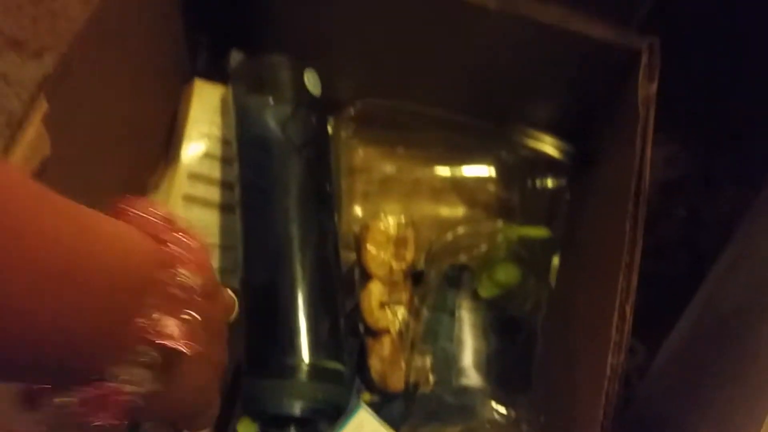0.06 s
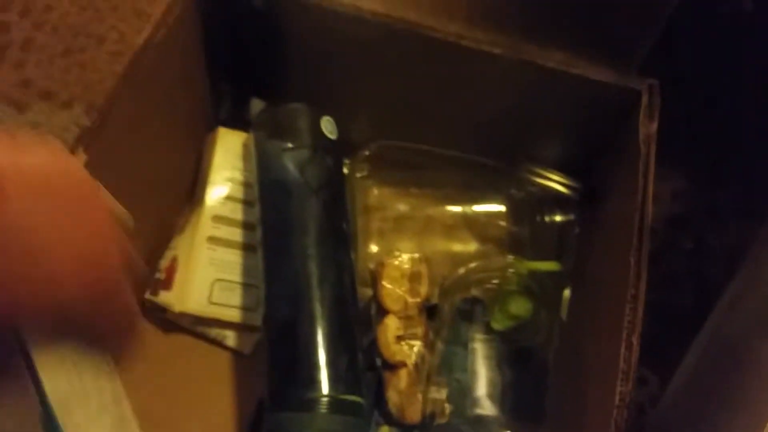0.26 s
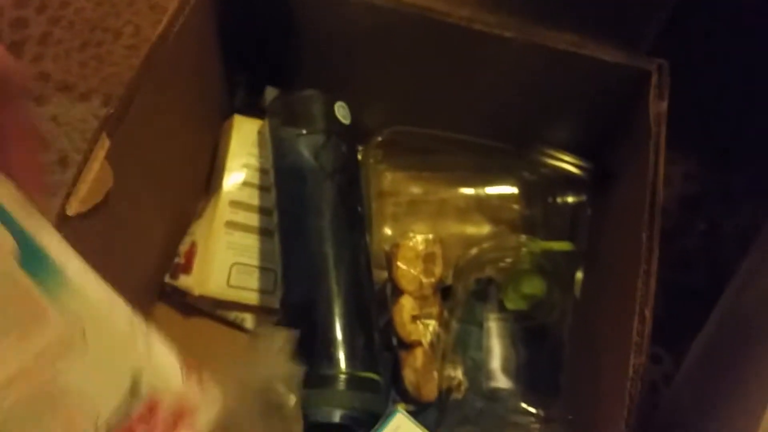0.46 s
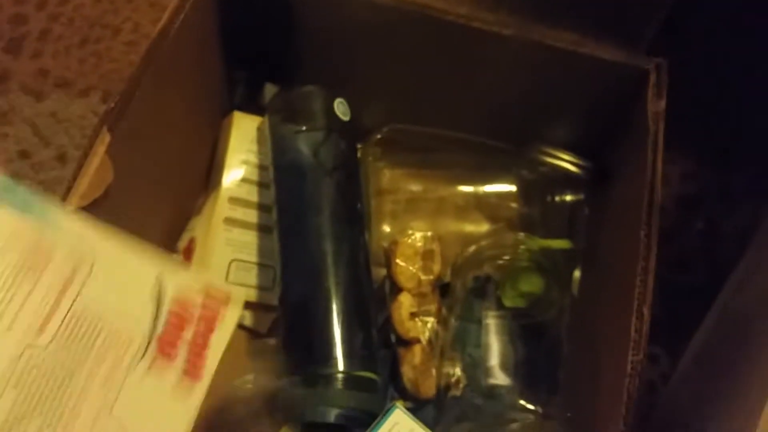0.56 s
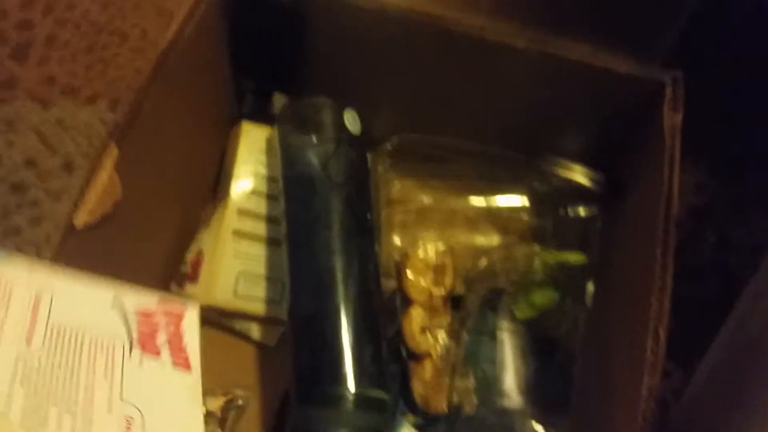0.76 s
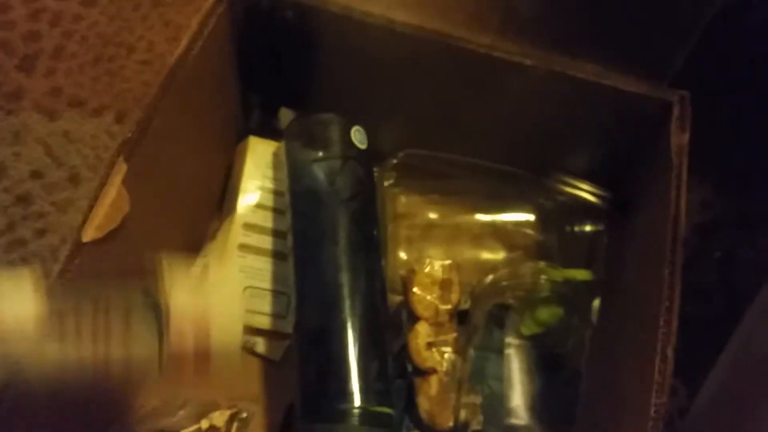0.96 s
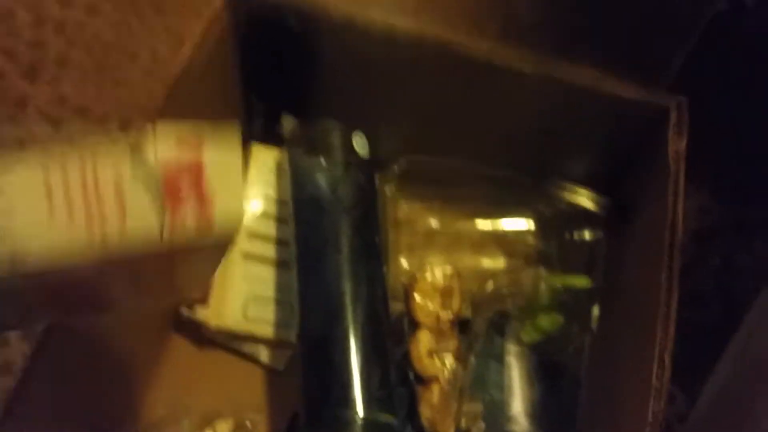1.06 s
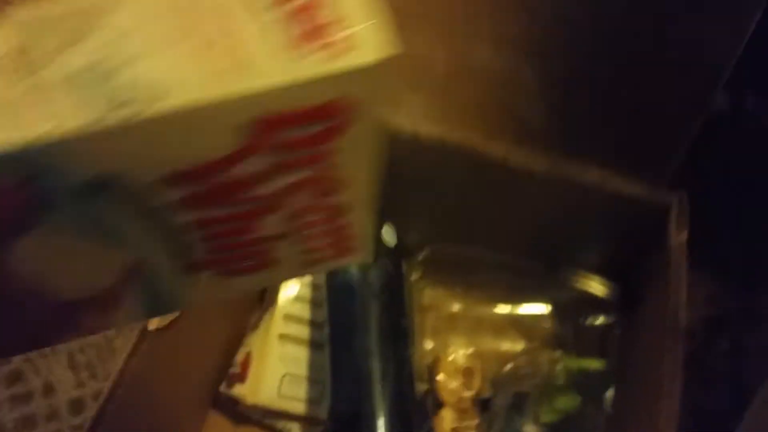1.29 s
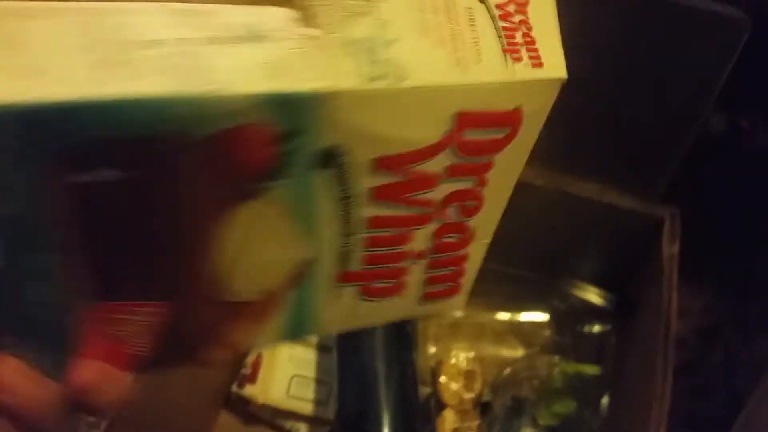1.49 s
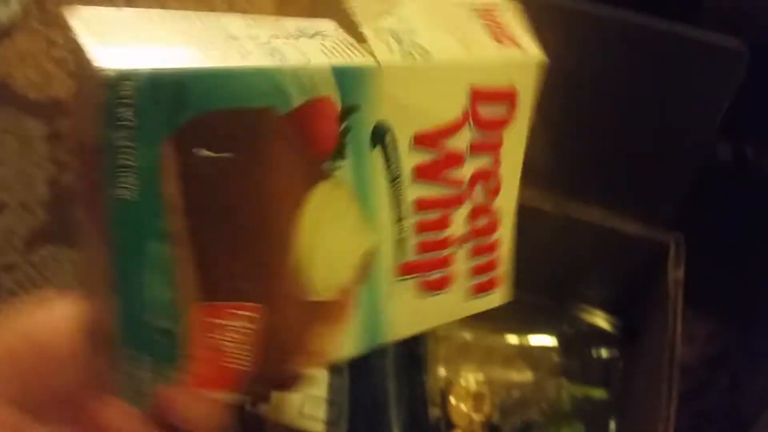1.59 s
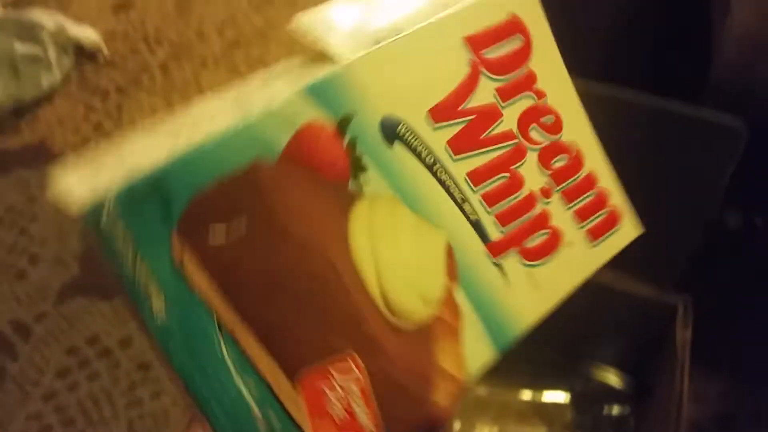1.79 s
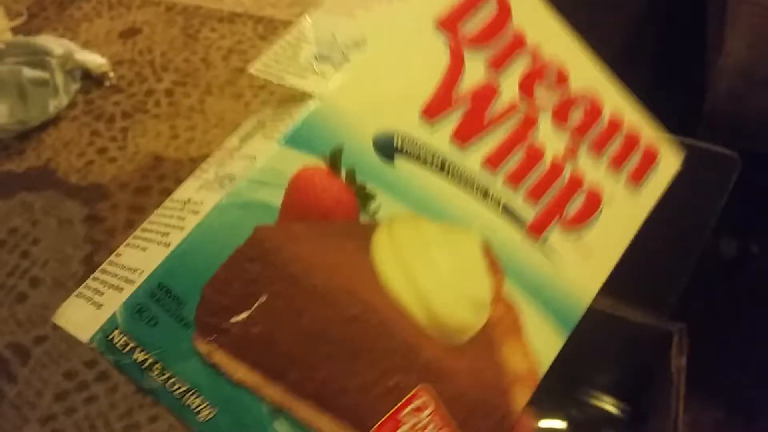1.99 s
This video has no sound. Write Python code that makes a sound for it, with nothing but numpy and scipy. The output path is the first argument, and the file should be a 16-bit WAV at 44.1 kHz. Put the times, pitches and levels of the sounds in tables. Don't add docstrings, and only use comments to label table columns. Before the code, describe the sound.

Close phone pickup indoors: dry cardboard knocks and rubbing, bright clusters of glass clinks and one hard clack, a last soft ring near one second, then low rumble, faint hum and tiny ticks.

```python
import sys
import numpy as np
from scipy import signal
from scipy.fft import rfft, irfft, next_fast_len
from scipy.io import wavfile
from scipy.ndimage import map_coordinates

SR = 44100
rng = np.random.default_rng(int(sys.argv[2]) if len(sys.argv) > 2 else 0)


def log_audio(samples):
    frames = np.atleast_2d(samples).T
    limited = np.clip(frames, -1, 1)
    pcm = np.round(limited * 32767).astype(np.int16)
    wavfile.write(sys.argv[1], SR, pcm)


def magnitude_from_level(level_db):
    exponent = np.asarray(level_db, float) / 20
    return 10 ** exponent


N = 90140
T = np.arange(N) / SR

# [f/Hz, likeness/0..1]
NEAR_LIKENESS = [(200, 0.97), (1000, 0.48), (4000, 0.18)]


def unit(x):
    return x / np.sqrt(np.mean(x ** 2) + 1e-20)


def along(points, hz):
    f, v = np.transpose(points)
    return np.interp(np.log(hz + 1), np.log(f + 1), v)


def wobble(rate):
    return map_coordinates(rng.standard_normal(int(N * rate / SR) + 4), [T * rate])


def filtered(x, response):
    m = next_fast_len(N + 8192)
    return irfft(rfft(x, m) * response(np.fft.rfftfreq(m, 1 / SR)), m)[..., :N]


def shaped(x, spectrum):
    return filtered(x, lambda hz: magnitude_from_level(along(spectrum, hz)))


def pair(likeness):
    def mid_side(hz):
        turn = np.arccos(np.clip(along(likeness, hz), -1, 1)) / 2
        return np.array([np.cos(turn), np.sin(turn)])
    mid, side = filtered(rng.standard_normal((2, N)), mid_side)
    return np.array([mid + side, mid - side])


def ports(x, balance, lag_s):
    def response(hz):
        right = magnitude_from_level(-along(balance, hz))
        delay = np.exp(-2j * np.pi * hz * lag_s)
        return 2 / (1 + right) * np.array([1 + 0 * right, right * delay])
    return filtered(x, response)


def burst(s, hold_s, t60, rise_s):
    t = np.maximum(T - s, 0)
    return (1 - np.exp(-t / rise_s)) * magnitude_from_level(-60 * np.maximum(t - hold_s, 0) / t60)


def room():
    # [f/Hz, level/dB]
    rumble_colour = [(20, -14.5), (45, -14), (70, -12), (260, -19), (800, -24.5), (1200, -36), (2000, -60),
                     (3300, -120)]
    hiss_colour = [(880, -30), (1500, -4), (1840, -5), (3480, -11.5), (6320, -3.5), (8320, -29),
                   (15600, -25.5)]
    # [f/Hz, level/dB]
    likeness = [(60, 0.97), (400, 0.98), (1000, 0.12), (8000, .2)]
    balance = [(60, -1.5), (130, 4), (290, 1), (640, 7), (1410, 4.5), (3100, 10.5), (6820, 26),
               (15000, -5.5)]
    # [t/s, gain/dB]
    gain = [(0, 12.5), (.3, 7), (.65, 7), (1.3, -1.5), (1.75, 5), (2.04, 8)]
    rumble = unit(shaped(pair(likeness), rumble_colour)) * magnitude_from_level(-53 + wobble(10))
    hiss = unit(shaped(pair(likeness), hiss_colour)) * magnitude_from_level(-68.5 + 0.56 * wobble(18))
    hum = magnitude_from_level(-50 + 0.9 * wobble(30)) * np.sin(2 * np.pi * 59.9 * T + 0.29 * wobble(23))
    drone = magnitude_from_level(-62.5 + 2 * wobble(16)) * np.sin(2 * np.pi * 378 * T + 1.1 * wobble(25))
    heard = ports(rumble + hiss + hum + drone, balance, lag_s=.00048)
    return magnitude_from_level(np.interp(T, *np.transpose(gain))) * heard


def walls(x):
    # [f/Hz, t60/s]
    decay = [(200, 0.19), (2000, 0.26), (10000, 0.12)]
    hz, t, z = signal.stft(rng.standard_normal((2, SR // 3)), SR, nperseg=256)
    z = z * magnitude_from_level(-60 * t / along(decay, hz)[:, None])
    tail = signal.istft(z, SR, nperseg=256)[1]
    late = np.pad(x, ((0, 0), (200, 0)))
    return signal.fftconvolve(late, tail / np.linalg.norm(tail[0]), axes=1)[:, :N]


def ticks():
    # [t/s, peak level/dB, treble level/dB]
    moments = [(0.061, -15.5, 0), (0.1038, -9, -8.5), (0.172, -26, -15), (.417, -24, -8), (.484, -25, -3),
               (.4975, -20, -2), (0.8975, -31, -4), (1.113, -44, -18), (1.135, -48.5, -20),
               (1.2123, -45.5, -20), (1.4574, -36, -19.5), (1.6682, -49.5, -24.5)]
    # [f/Hz, level/dB]
    body_colour = [(2500, -19.5), (3800, -2), (5600, 4), (7300, -3.5), (8500, -30), (15500, -61.5)]
    treble_colour = [(6000, -40), (8500, -3.5), (12000, 0), (15500, -10)]
    body = unit(shaped(rng.standard_normal(N), body_colour))
    treble = unit(shaped(rng.standard_normal(N), treble_colour))
    out = np.zeros(N)
    for s, db, treble_db in moments:
        click = burst(s, hold_s=0, t60=0.01, rise_s=0.00041)
        out += magnitude_from_level(db - 2) * click * (body + magnitude_from_level(treble_db) * treble)
    return out * magnitude_from_level([[0], [-10]])


def drag():
    # [t/s, level/dB]
    strength = [(0, -40.5), (.1, -33.5), (.22, -38.5), (.35, -37), (.5, -35.5), (.63, -29.5), (.72, -36),
                (.82, -40.5), (.865, -50), (.98, -50.5), (1.05, -86.5)]
    # [f/Hz, level/dB]
    colour = [(80, -24), (170, -0.5), (400, -8), (1500, -18.5), (3700, -17.5), (6400, -8.5), (7750, -18.5),
              (12300, -16.5), (15700, -29)]
    press_db = np.interp(T, *np.transpose(strength))
    noise = unit(shaped(pair(NEAR_LIKENESS), colour))
    treble = filtered(noise, lambda hz: hz > 7800)
    noise = noise + treble * (magnitude_from_level(.6 * np.minimum(press_db + 38.5, 0)) - 1)
    lumps_db, grit_db = 1.8 * wobble(30), 1.5 * wobble(400)
    return magnitude_from_level(press_db + lumps_db + grit_db) * noise


def box():
    # [t/s, level/dB, panel f/Hz, rubbing/s, rasp over panel/dB]
    thuds = [
        (0.0404, -21, 357.9, 0.051, -9),
        (0.088, -26, 180, 0.009, -10),
        (.113, -26, 366, 0.012, -35),
        (0.358, -22.5, 387, 0.0066, -9.5),
        (.386, -27, 347.6, 0.025, -8.5),
        (.548, -29, 298, 0.0061, 1),
        (0.58, -30, 218, 0.0031, -11.5),
        (0.606, -33, 190, 0.0089, -3),
        (.714, -21.5, 400.4, 0.0028, -6),
        (0.85, -30.5, 456.6, 0.0018, -10),
    ]
    # [f/Hz, level/dB]
    rasp_colour = [(100, -8), (400, -7.5), (1000, -7), (1700, -7.5), (2500, -14.5), (6000, -24),
                   (15000, -41)]
    rasp = magnitude_from_level(2.7 * wobble(150)) * unit(shaped(pair(NEAR_LIKENESS), rasp_colour))
    out = np.zeros((2, N))
    for s, db, hz, rub_s, rasp_db in thuds:
        push = burst(s, rub_s, t60=.06, rise_s=.001)
        snap = magnitude_from_level(6) * burst(s, hold_s=0, t60=.012, rise_s=0.00038)
        waver = .7 * wobble(hz / 4)
        panel = magnitude_from_level(2 * wobble(90)) * np.sin(2 * np.pi * hz * (T - s) + waver)
        out += magnitude_from_level(db) * (push * panel + magnitude_from_level(rasp_db) * (push + snap) * rasp)
    return out


def taps(rows):
    out, t = np.zeros((2, N + SR)), np.arange(SR // 4) / SR
    for (s, db, hz, t60), turn in zip(rows, rng.random(len(rows))):
        shift = np.array([[0], [2 * np.pi * turn * min(hz / 8000, 1)]])
        rise = 1 - np.exp(-t * hz / 0.64)
        shape = magnitude_from_level(db - 60 * t / t60) * rise
        out[:, round(s * SR):][:, :len(t)] += shape * np.sin(2 * np.pi * hz * t + shift)
    return out[:, :N]


def cardboard_knocks():
    # [t/s, peak level/dB, f/Hz, t60/s]
    knocks = [(.0404, -17.5, 1550, 0.018), (.055, -23.5, 1500, 0.013), (.066, -21, 1400, 0.017),
              (.075, -27, 1500, .015), (.083, -16, 1670, 0.023), (.318, -30, 178, 0.096),
              (.372, -27.5, 1460, 0.029), (.432, -31, 804, 0.018), (.548, -16, 850, .016),
              (.549, -23, 468, 0.094), (.556, -21.5, 126.5, .1), (.6055, -9.5, 216, .04),
              (.628, -25, 242, .05), (.65, -24.5, 188, .07), (.7155, -15.5, 746, .014),
              (.748, -30, 1360, 0.038), (.853, -31, 807, 0.027)]
    return taps(knocks)


def glass_pings():
    # [t/s, peak level/dB, f/Hz, t60/s]
    pings = [(.044, -24.5, 4720, .03), (.085, -24.5, 5450, 0.097), (.2605, -18, 5425, 0.029),
             (.272, -11, 5356, .04), (.277, -13.5, 5460, 0.035), (.312, -25.5, 5460, 0.093),
             (.388, -28, 7350, 0.037), (.388, -29, 6600, 0.05), (.431, -22, 6940, 0.031),
             (.5975, -9.5, 6130, 0.052), (.4973, -15, 9740, 0.024), (.498, -22, 9300, 0.077),
             (.4985, -27, 14600, 0.061), (.507, -22.5, 4600, 0.031), (.508, -19.5, 6330, 0.023),
             (.6145, -7, 9500, 0.038), (.626, -23.5, 7000, 0.065), (.63, -24, 13600, 0.04),
             (.69, -32, 7135, 0.47), (.722, -31, 13700, 0.054), (.7457, -15, 3880, 0.014),
             (.783, -29, 7200, 0.042), (.9118, -29, 5353, 0.16), (.965, -41, 2515, 0.11),
             (.925, -42, 5405, 0.4), (1.4575, -47.5, 5270, 0.029), (1.4575, -45.5, 6070, 0.029)]
    return taps(pings)


def glass(main_hz, modes, hits):
    # [f/Hz, level/dB]
    crack_colour = [(1200, -19), (2600, -10), (4000, -5.5), (7000, -2.5), (9000, -21.5), (14500, -17.5),
                    (15700, -32.5)]
    rattle_rate = 170
    out, t = np.zeros((2, N + SR)), np.arange(SR // 5) / SR
    crowd = rng.random((20, 3))
    main_db, main_t60 = np.transpose(modes)
    hz = np.append(main_hz, 2300 + 13000 * crowd[:, 0] ** 1.4)[:, None]
    level = np.append(main_db, -14 - 12 * crowd[:, 1])[:, None]
    t60 = np.append(main_t60, 0.14 * (.5 + crowd[:, 2]))[:, None]
    noise = unit(shaped(rng.standard_normal((2, N)), crack_colour))
    grit_db = 4.5 * wobble(250)
    at = np.minimum(t * rattle_rate, 62)
    knot, part = at.astype(int), at % 1
    for s, db, hard_db, free_s in hits:
        start = round(s * SR)
        knots = rng.standard_normal((len(hz), 64))
        chatter = knots[:, knot] * (1 - part) + knots[:, knot + 1] * part
        chatter_db = 6 * chatter * (hz / 8000) ** .25 * np.minimum(t * rattle_rate, 1)
        gain_db = level + hard_db * np.log2(hz / 4000) + 2 * rng.standard_normal(hz.shape)
        gain = magnitude_from_level(gain_db + chatter_db - 60 * t / t60)
        phase = 2 * np.pi * hz * t + .45 * chatter[::-1]
        turn = 2 * np.pi * rng.random(hz.shape)
        left = (gain * np.sin(phase)).sum(axis=0)
        right = (gain * np.sin(phase + turn)).sum(axis=0)
        damping = magnitude_from_level(-60 * np.maximum(t - free_s, 0) / 0.08)
        ring = np.array([left, right]) * damping * (1 - np.exp(-t * 5000))
        crack = magnitude_from_level(-4 - 60 * t / 0.018)
        fizz = magnitude_from_level(-11.5 + hard_db + grit_db[start:][:len(t)] - 60 * t / .13)
        out[:, start:][:, :len(t)] += magnitude_from_level(db) * (ring + noise[:, start:][:, :len(t)] * (crack + fizz))
    return out[:, :N]


def lidded_jar():
    # [level/dB, t60/s]
    mode_hz = [4683, 4823, 6490, 8640]
    modes = [(-4, 0.04), (-3, 0.14), (-15.5, .05), (-4, 0.22)]
    # [t/s, level/dB, hardness/dB per octave, free ringing/s]
    hits = [
        (0.0463, -28.5, -13.5, 0.012),
        (0.0592, -28, -12.5, 0.045),
        (0.3617, -32.5, 3.5, 0.031),
        (0.3862, -28, -8.5, 0.032),
    ]
    return glass(mode_hz, modes, hits)


def tall_jar():
    # [level/dB, t60/s]
    mode_hz = [2138]
    modes = [(0, .22)]
    # [t/s, level/dB, hardness/dB per octave, free ringing/s]
    hits = [
        (.2558, -29.5, -10, 0.044),
        (.4314, -22.5, -10.5, 0.054),
        (.7457, -26.5, -9.5, 0.095),
    ]
    return glass(mode_hz, modes, hits)


def slim_bottle():
    # [level/dB, t60/s]
    mode_hz = [6140, 6820, 9390, 9465, 13496, 13561, 14470]
    modes = [(-3.5, .08), (1.5, .05), (-4, .14), (1, .14), (-5, 0.16), (-9, .14), (-3, .25)]
    # [t/s, level/dB, hardness/dB per octave, free ringing/s]
    hits = [
        (.5165, -22, 0, .01),
        (.531, -31, 4, 0.019),
        (.554, -29, 2.6, .015),
        (0.62, -28.5, 3, .02),
        (.719, -36, 3.5, .012),
    ]
    return glass(mode_hz, modes, hits)


def small_jar():
    # [level/dB, t60/s]
    mode_hz = [2747, 3065, 3950, 6360, 7062, 7413, 9080, 9905, 12320]
    modes = [(-8.5, 0.2), (-1.5, 0.15), (0, 0.028), (0, 0.23), (2.5, 0.1), (-3.5, 0.096), (-6, 0.1),
             (-0.5, 0.086), (-13, 0.11)]
    # [t/s, level/dB, hardness/dB per octave, free ringing/s]
    hits = [
        (0.388, -36.5, -1, 0.02),
        (0.4338, -29, -2.5, 0.075),
        (.707, -39, -0.5, 0.046),
        (0.7465, -24.5, -10.5, 0.043),
        (.781, -34, -9, 0.093),
        (0.796, -33.5, 2.5, 0.047),
    ]
    return glass(mode_hz, modes, hits)


def tall_bottle():
    # [level/dB, t60/s]
    mode_hz = [3048, 3110, 6125, 4400, 8975, 10300, 11200, 12150]
    modes = [(-12, 0.42), (-6.5, .15), (1, .05), (-7, .015), (-12, .07), (-8.5, .04), (0.5, .018),
             (-18, 0.0806)]
    # [t/s, level/dB, hardness/dB per octave, free ringing/s]
    hits = [
        (0.2558, -24, -10.5, 0.077),
        (.597, -14.5, 0.5, .006),
        (0.6148, -22, -3.5, .012),
        (.63, -19.5, -5.5, 0.053),
        (.795, -29.5, -4, .035),
        (0.9115, -32, -20.5, 0.0075),
    ]
    return glass(mode_hz, modes, hits)


def wide_jar():
    # [level/dB, t60/s]
    mode_hz = [2074, 2515, 3828, 4737, 5195, 5425, 5480, 10225, 11700]
    modes = [(-3.5, 0.37), (-11.5, 0.12), (-11.5, 0.18), (-16.5, 0.067), (-3.5, 0.2), (-2, 0.2), (4, 0.028),
             (-1, 0.054), (-13, 0.25)]
    # [t/s, level/dB, hardness/dB per octave, free ringing/s]
    hits = [
        (.250, -32, -7.5, 0.044),
        (.2558, -22, 1.5, 0.012),
        (.272, -25, -2, 0.0046),
        (.290, -29, -4, 0.18),
        (.316, -40, -2, 0.068),
        (.4314, -24, -3, 0.076),
        (.685, -33.5, -2.5, 0.022),
        (.7457, -31, -4, 0.036),
        (.9118, -30.5, -5, 0.051),
        (.930, -41, -4.5, 0.093),
    ]
    return glass(mode_hz, modes, hits)


def scene():
    # [f/Hz, level/dB]
    balance = [(60, -1.5), (400, 6.5), (2200, 5), (3300, 14.5), (4800, 17.5), (7500, 32), (9500, 11.5),
               (15000, -2.5)]
    jars = wide_jar() + small_jar() + tall_jar() + lidded_jar()
    bottles = tall_bottle() + slim_bottle()
    near = jars + bottles + glass_pings() + cardboard_knocks() + box() + ticks()
    near = near + magnitude_from_level(-10.5) * walls(near) + drag()
    return ports(near, balance, lag_s=.00012) + room()


def band_limit(x):
    return signal.sosfilt(signal.butter(12, 15710, fs=SR, output="sos"), x)


def record(dry):
    ceiling = 1.1
    dry = filtered(dry, lambda hz: hz < 15750)
    mix = dry / (1 + np.abs(dry / ceiling) ** 6) ** (1 / 6)
    return band_limit(mix)


dry = scene()
out = record(dry)
log_audio(out)
```